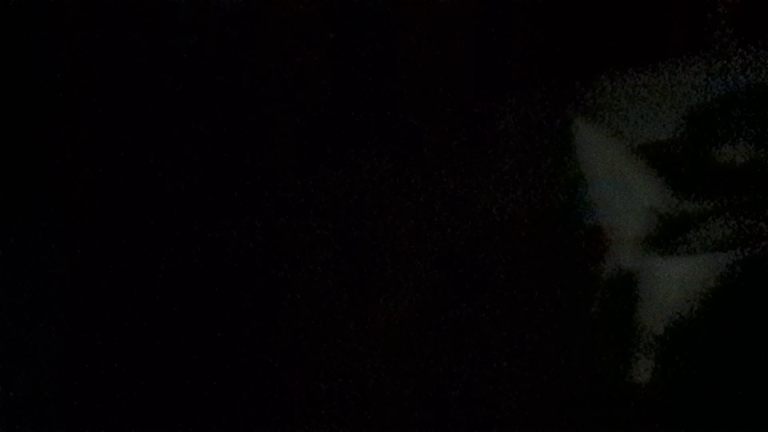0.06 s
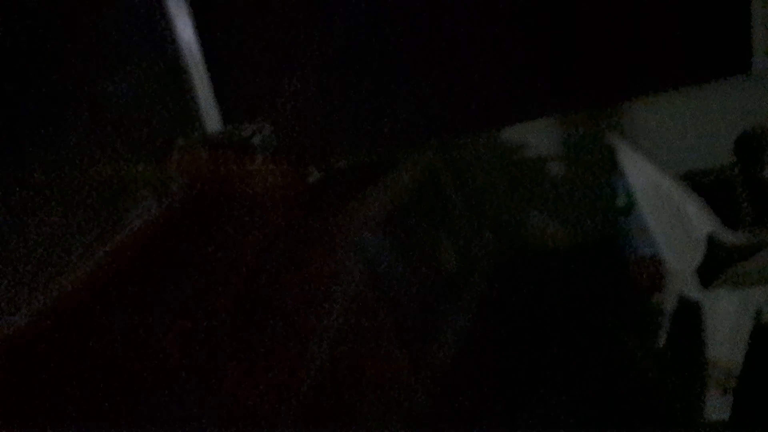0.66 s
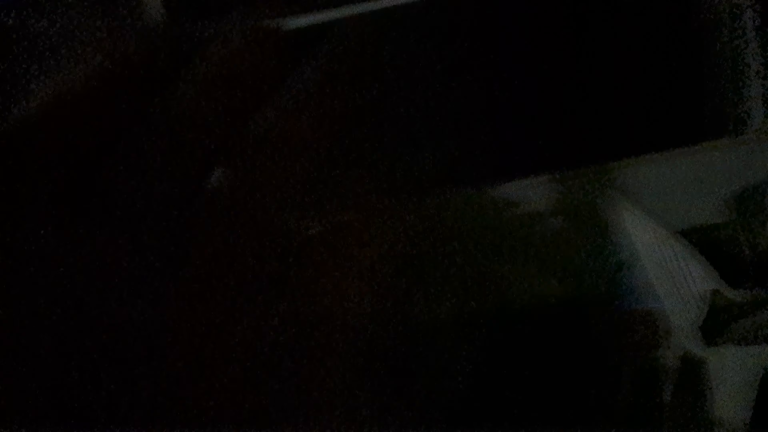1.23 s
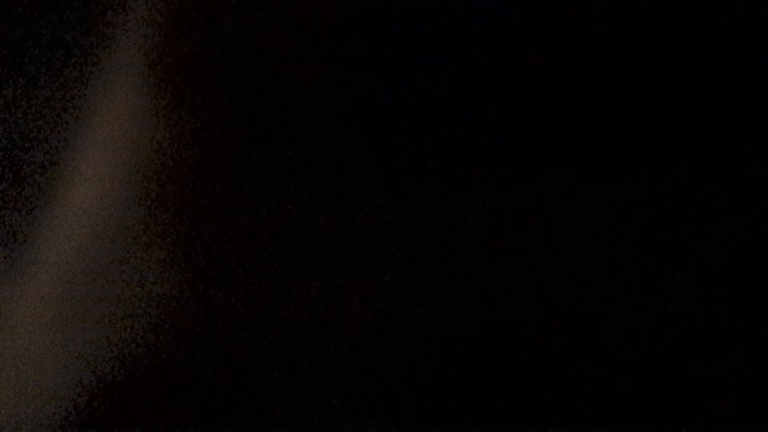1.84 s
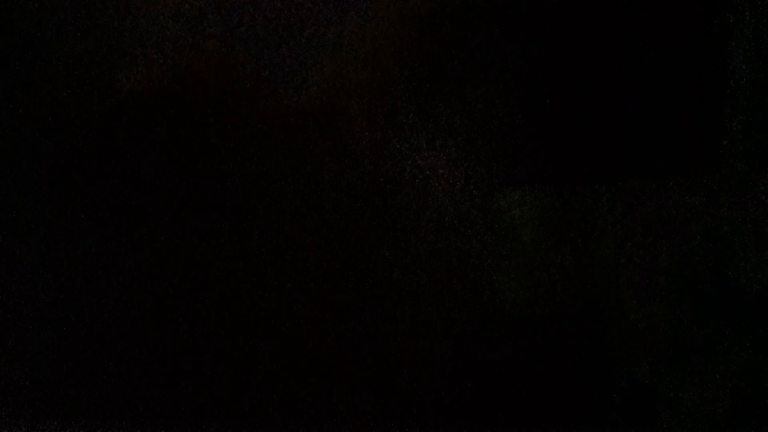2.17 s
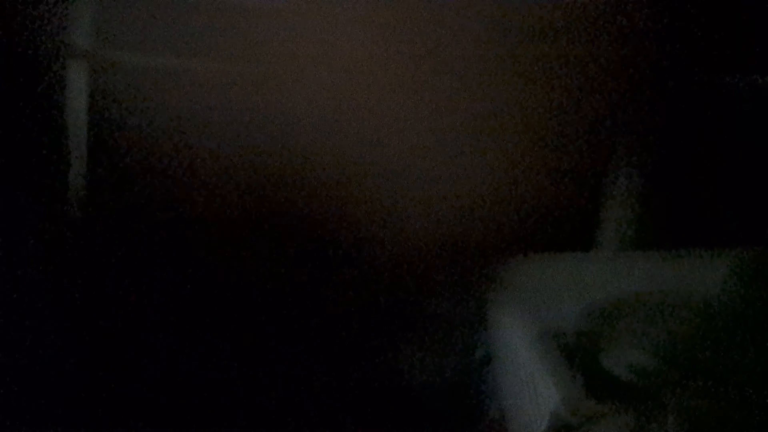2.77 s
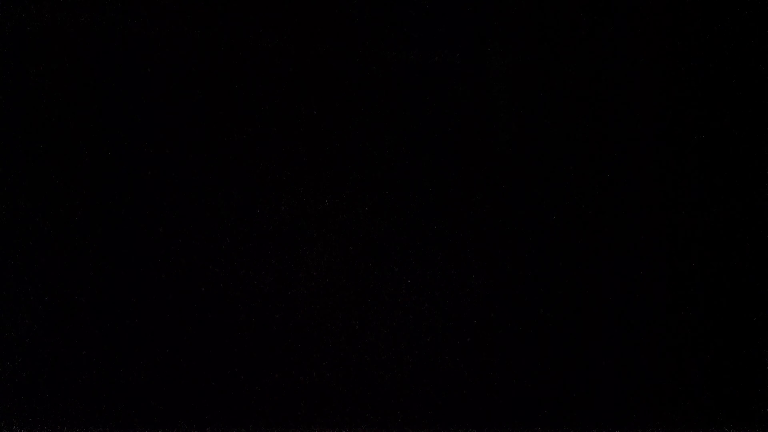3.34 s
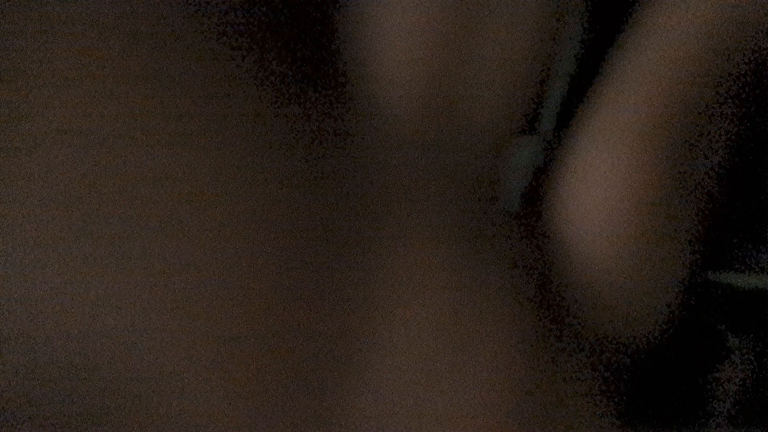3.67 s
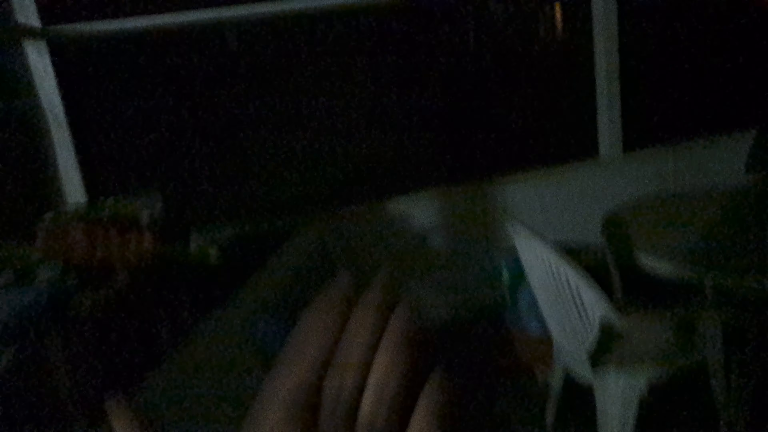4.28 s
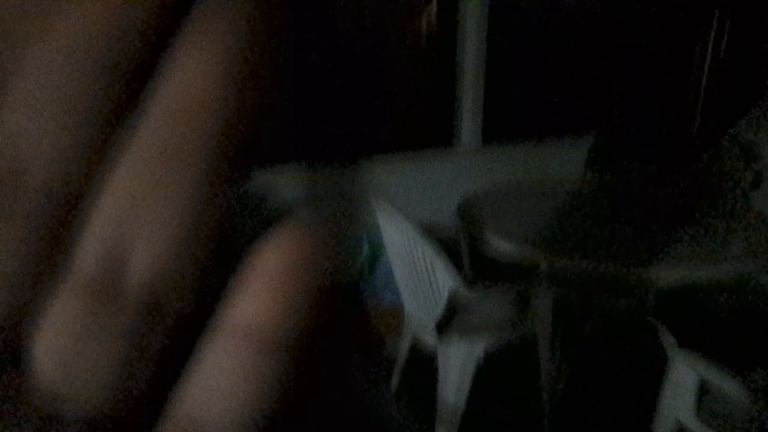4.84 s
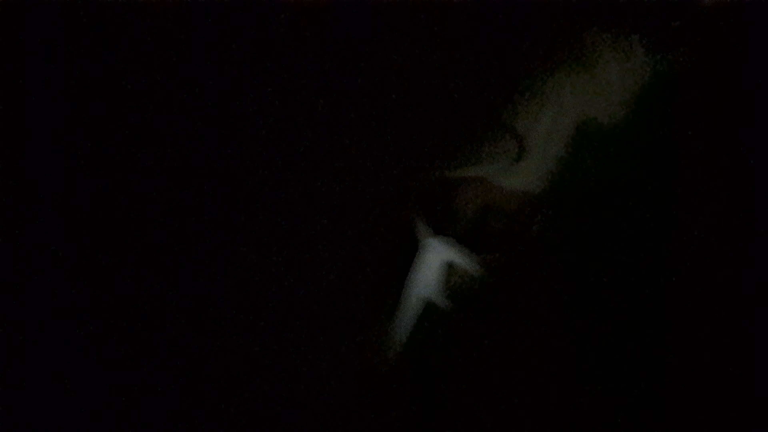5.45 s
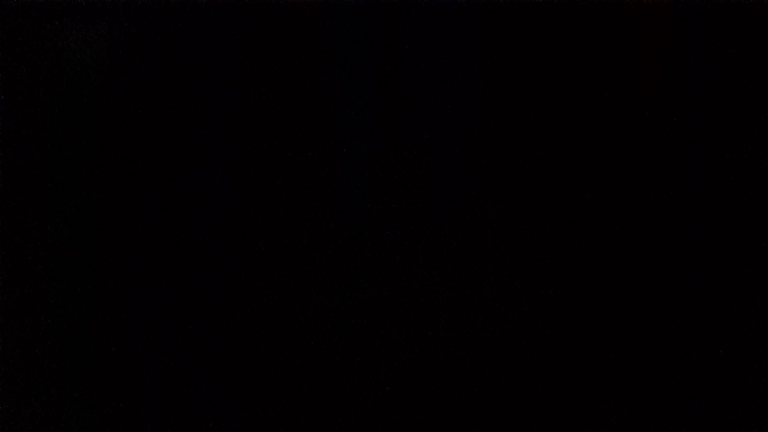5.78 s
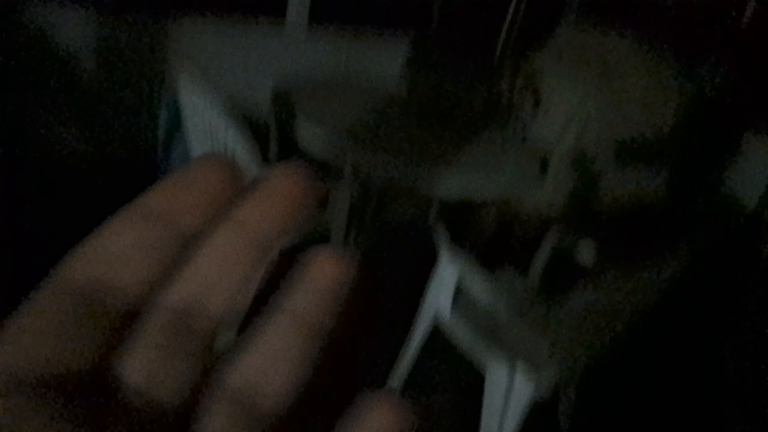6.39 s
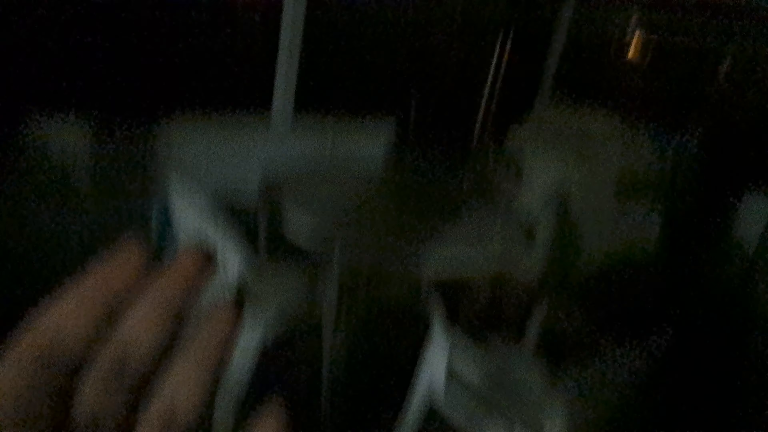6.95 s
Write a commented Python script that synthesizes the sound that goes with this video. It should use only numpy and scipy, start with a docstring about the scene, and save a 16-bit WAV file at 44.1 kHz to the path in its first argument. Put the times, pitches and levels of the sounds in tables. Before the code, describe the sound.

Fingers tap, knock and rub on a hand-held phone right at the microphone, over faint rain.

```python
"""A porch at night: fingers tap and shift on a hand-held phone, with light rain around it. At first the palm
cups the left microphone port, so the taps boom there; then they turn into dry knocks and fade. Finger pads bump
the air at the ports, and after each tap the hand settles with a low rumble. Skin scuffs over the case and
judders across the left port, two more sharp taps follow, and the rain is heard more faintly at first and more
fully later."""
import sys
import numpy as np
from scipy import signal
from scipy.fft import rfft, irfft, next_fast_len
from scipy.io import wavfile
from scipy.ndimage import map_coordinates

SR = 44100
rng = np.random.default_rng(int(sys.argv[2]) if len(sys.argv) > 2 else 0)


def transcribe(u):
    """Save the signal u as a 16-bit wav file named by the first command-line argument.

    u: samples, shape (n,) or (channels, n), limited to [-1, 1]; the rate is SR.
    q: integer samples, one column per channel.
    """
    v = np.clip(np.atleast_2d(u).T, -1, 1)
    q = np.round(v * 32767).astype(np.int16)
    wavfile.write(sys.argv[1], SR, q)


N = 318402
T = np.arange(SR // 4) / SR  # seconds within one event


def amp(db):
    """Decibels to gain."""
    return 10 ** (np.asarray(db) / 20)


def unit(x):
    """Scale to rms 1."""
    return x / np.sqrt(np.mean(x ** 2) + 1e-20)


def blow(x, db, spread_s=0.03):
    """Scale a short sound so that its energy, spread over spread_s, has this level."""
    energy = np.sum(x ** 2, axis=-1, keepdims=True)
    return amp(db) * x * np.sqrt(spread_s * SR / (energy + 1e-20))


def sides(pan_db):
    """Left and right gains for a left-minus-right level."""
    return amp([[pan_db / 2], [-pan_db / 2]])


def along(points, hz):
    """Interpolate (Hz, value) points on a log frequency axis."""
    points_hz, values = np.transpose(points)
    return np.interp(np.log(hz + 1), np.log(points_hz), values)


def curves(rows):
    """One value per sample for each column after the time."""
    times_s, *columns = np.transpose(rows)
    return [np.interp(np.arange(N) / SR, times_s, column) for column in columns]


def wobble(rate_hz):
    """A smooth random curve, rate_hz knots a second."""
    knots = rng.standard_normal(int(N * rate_hz / SR) + 4)
    return map_coordinates(knots, [np.arange(N) * rate_hz / SR])


def swell(peak_s, width_s):
    """A rounded rise and fall with soft skirts."""
    return 1 / (1 + ((np.arange(N) / SR - peak_s) / width_s) ** 2) ** 3


def stroke(length_s):
    """The arched envelope of one slide."""
    return np.sqrt(np.abs(np.sin(np.pi * np.minimum(T / length_s, 1))))


def filtered(x, response):
    """Apply a gain that is a function of Hz."""
    n = x.shape[-1]
    size = next_fast_len(n + 8192)
    hz = np.fft.rfftfreq(size, 1 / SR)
    return irfft(rfft(x, size) * response(hz), size)[..., :n]


def coloured(x, spectrum, tilt_db=0, size=2048):
    """Minimum-phase colouring, tilted by tilt_db per octave above 1500 Hz."""
    hz = np.fft.rfftfreq(size, 1 / SR)
    octaves = np.log2(np.maximum(hz, 1500) / 1500)
    cepstrum = irfft(np.log(amp(along(spectrum, hz) + tilt_db * octaves)))
    cepstrum[1:size // 2] *= 2
    cepstrum[size // 2 + 1:] = 0
    kernel = irfft(np.exp(rfft(cepstrum)))
    return signal.fftconvolve(np.atleast_2d(x), kernel[None], axes=1)[:, :x.shape[-1]]


def ring(hz, t60_s, attack_s):
    """One damped mode."""
    return np.sin(2 * np.pi * hz * T) * amp(-60 * T / t60_s) * (1 - np.exp(-T / attack_s))


def struck(modes, attack_s, base_hz=1):
    """Modes of alternating sign, their strengths and pitches varying from blow to blow."""
    gain_db, detune = rng.normal(0, [[3], [0.055]], (2, len(modes)))
    return sum((-1) ** k * amp(db + gain_db[k]) * ring(base_hz * pitch * np.exp(detune[k]), t60, attack_s)
               for k, (pitch, db, t60) in enumerate(modes))


def grit(shape, spread_db):
    """Noise made of grains of very unequal size."""
    return unit(rng.standard_normal(shape) * amp(spread_db * rng.standard_normal(shape)))


def add(track, start_s, sound):
    """Mix a sound in at a time."""
    i = max(round(start_s * SR), 0)
    track[..., i:i + sound.shape[-1]] += sound[..., :N - i]


# Each row: frequency in Hz, left-right correlation of the rain.
RAIN_LIKENESS = [(60, 0.2), (180, 0.99), (550, 0.52), (1500, 0.14), (5000, 0.23), (15000, 0.14)]

def shower(spectrum, spread_db, lag_s=0):
    """Countless far drops, partly alike in both ports, reaching the right one lag_s later."""
    def mid_side_gains(hz):
        angle = np.arccos(np.clip(along(RAIN_LIKENESS, hz), 0, 1)) / 2
        return amp(along(spectrum, hz)) * [np.cos(angle), np.sin(angle)]
    mid, side = filtered(grit((2, N), spread_db), mid_side_gains)
    return unit(np.array([mid + side, np.roll(mid - side, round(lag_s * SR))]))


# Each row: frequency in Hz, relative density in dB.
PATTER_SPECTRUM = [(40, -17), (120, -1), (220, 1.5), (400, 3), (700, -1.5), (1200, -6), (1800, -29),
                   (4000, -81)]
HISS_SPECTRUM = [(700, -91), (1300, -4), (1900, 1), (2400, -2.5), (3000, -6.5), (4200, -9.5), (6000, -24),
                 (10000, -70)]
SPRAY_SPECTRUM = [(2500, -34), (4800, 0), (7800, -2), (8800, -8), (10500, -5.5), (12700, -4.5), (15500, -9),
                  (16500, -42)]
# Each row: time in seconds, then patter, hiss and spray in dB before each layer's trim.
RAIN_LEVELS = [(0.0, -63, -61.5, -68), (0.24, -65.5, -64.5, -71.5), (1.22, -67, -62.5, -70.5),
               (1.37, -72, -69, -72), (2.17, -66.5, -63, -69.5), (2.59, -62.5, -61, -62),
               (3.04, -67.5, -60, -63), (3.96, -61, -57, -63), (4.38, -64, -61.5, -65.5),
               (5.57, -65.5, -61, -65.5), (6.56, -57.5, -55, -61), (7.22, -62, -58, -62.5)]

def rain(lag_s=0.00049):
    """Patter on the ground, hiss in the leaves and fine spray."""
    patter_db, hiss_db, spray_db = curves(RAIN_LEVELS)
    drift_db = 0.7 * wobble(7)
    patter = amp(patter_db + 6.5) * shower(PATTER_SPECTRUM, spread_db=5.5)
    hiss = amp(hiss_db + 3 + drift_db) * shower(HISS_SPECTRUM, spread_db=6, lag_s=lag_s)
    spray = amp(spray_db + 2.5) * shower(SPRAY_SPECTRUM, spread_db=5, lag_s=lag_s)
    return (patter + hiss + spray) * sides(pan_db=-0.72)


TREMOR_DB, SETTLE_DB = [[-80], [-62]], [[-22], [-10.5]]  # left, right; settling is relative to the thump
# Each row: frequency in Hz, relative density in dB.
RUMBLE_SPECTRUM = [(15, -4), (30, -2), (60, 4), (90, -4), (150, -10.5), (300, -20.5), (600, -33),
                   (1500, -83)]
# Each row: peak time in seconds, width in seconds, left level in dB, right level in dB.
GRIP_SHIFTS = [(0.01, 0.053, -35, -64), (0.177, .1, -25.5, -49), (0.64, 0.1, -41.5, -41),
               (1.197, 0.024, -26, -46), (2.933, 0.046, -72, -40.5), (3.37, 0.038, -39.5, -39),
               (3.489, 0.036, -43, -42), (3.72, 0.12, -73, -44), (4.27, 0.1, -45, -49),
               (4.48, .06, -44, -43), (4.654, 0.083, -53, -52), (4.839, 0.096, -37, -31.5),
               (5.248, 0.18, -65, -53.5), (5.587, 0.046, -50, -47), (6.8, 0.29, -52, -52),
               (7.2, 0.046, -37.5, -38)]

def grip():
    """The hand rumbles on the case: it trembles at rest, settles after taps, drags at scuffs, shifts."""
    effort = np.zeros((2, N)) + amp(TREMOR_DB)
    for start_s, thump_db, knock_db, *_ in TAPS:
        left_db, right_db = thump_levels(start_s, thump_db, knock_db)
        effort += amp([[left_db], [right_db]]) * amp(SETTLE_DB) * swell(start_s + 0.032, width_s=0.059)
    for start_s, length_s, db, _ in SCUFFS:
        effort += amp(db - 7.5) * sides(pan_db=-28) * swell(start_s + length_s, width_s=0.058)
    for peak_s, width_s, left_db, right_db in GRIP_SHIFTS:
        effort += amp([[left_db], [right_db]]) * swell(peak_s, width_s)
    rumble = unit(filtered(rng.standard_normal((2, N)), lambda hz: amp(along(RUMBLE_SPECTRUM, hz))))
    return effort * amp(3.6 * wobble(22)) * rumble


PALM_LIFTS_S = 1.3
SEAL_GAIN_DB, SEAL_CEILING_DB, OPEN_LEFT_DB = 19.5, -13.5, -35

def thump_levels(start_s, thump_db, knock_db):
    """Left and right dB: while the palm seals the left port, trapped air turns a knock into a boom."""
    if start_s < PALM_LIFTS_S:
        return min(knock_db + SEAL_GAIN_DB, SEAL_CEILING_DB), thump_db
    return thump_db + OPEN_LEFT_DB, thump_db


# Low case modes at each port. Each row: frequency in Hz, relative level in dB, T60 in seconds.
LEFT_MODES = [(67.8, -16, 0.31), (131, 6, 0.028), (236, -17, 0.0076)]
RIGHT_MODES = [(67, -0.69, 0.13), (132, -0.58, 0.045), (223, 0.94, 0.03)]

def thump(modes):
    """The case rocks in the hand, a little differently each time."""
    out = np.zeros(len(T))
    for hz, db, t60_s in modes:
        gain = amp(db + rng.normal(0, 5.1))
        out += gain * ring(hz * np.exp(rng.normal(0, 0.066)), t60_s, attack_s=0.0012)
    return out


# Each row: frequency in Hz, relative density in dB.
CLICK_SPECTRUM = [(300, -16), (900, 1), (1400, 7), (2100, 2), (3200, -2.5), (4800, -3.5), (7000, -3.5),
                  (9500, -8), (13000, 0.5), (16000, -8.5)]

def click(tilt_db):
    """The fingertip lands with a sharp edge and chatters, then bounces back more softly a few times."""
    strikes = amp(-60 * T / 0.02)
    for delay_s, db in zip(rng.uniform(0.004, 0.026, size=3), rng.normal(-23.5, 1.4, size=3)):
        strikes += (T > delay_s) * amp(db - 60 * np.abs(T - delay_s) / 0.009)
    chatter = grit((2, len(T)), spread_db=5) * strikes
    chatter[:, 0] -= 7  # the sharp edge
    return coloured(chatter, CLICK_SPECTRUM, tilt_db)


# Sliding skin. Each row: frequency in Hz, relative density in dB.
SKIN_SPECTRUM = [(250, 4), (500, -12), (1200, 6.5), (2000, -1), (3500, 2.5), (7000, -1), (9500, -4),
                 (13000, 2.5), (16000, -4)]

def skid(length_s=0.072, t60_s=0.043):
    """After landing, the fingertip skids with a bright sizzle, then sticks."""
    envelope = stroke(length_s) * amp(-60 * T / t60_s)
    return coloured(grit((2, len(T)), spread_db=3) * envelope, SKIN_SPECTRUM, tilt_db=5.5)


# Each row: multiple of the knock's pitch, relative level in dB, T60 in seconds.
SHELL_MODES = [(.82, 4.5, 0.024), (1.12, 2.5, 0.027), (1.6, -3.5, 0.014)]
# Air in the hand's hollow; hard plastic. Each row: frequency in Hz, relative level in dB, T60 in seconds.
HOLLOW_MODES = [(754, 12, 0.0048), (1027, -4, 0.011)]
PLASTIC_MODES = [(1850, -1, .006), (2300, 0, .007), (4500, -3, .004), (5000, -2, .005)]

def tap(left_db, right_db, knock_db, knock_hz, hollow_db, click_db, pan_db, tilt_db, skid_db, lead_s):
    """A finger lands at lead_s: it rocks the case, rings shell, hollow and plastic, clicks and skids."""
    out = np.zeros((2, SR // 2))
    add(out[0], lead_s, blow(thump(LEFT_MODES), left_db))
    add(out[1], lead_s + 0.00046, blow(thump(RIGHT_MODES), right_db))
    knock = blow(struck(SHELL_MODES, attack_s=0.0018, base_hz=knock_hz), knock_db)
    hollow = blow(struck(HOLLOW_MODES, attack_s=0.0036), hollow_db)
    edge = blow(click(tilt_db), click_db - 0.18)
    # a flatter, duller finger drives the hard plastic more
    clack = blow(struck(PLASTIC_MODES, attack_s=0.00051), click_db - 18.5 - tilt_db)
    body_pan, click_pan = sides(pan_db + 2.5), sides(pan_db)
    for port, lag_s in enumerate([0, 0.0004]):
        add(out[port], lead_s - 0.002 + lag_s, body_pan[port] * knock)  # the soft pad touches first
        add(out[port], lead_s + lag_s, body_pan[port] * hollow + click_pan[port] * (edge[port] + clack))
    add(out, lead_s + 0.0067, blow(skid(), skid_db) * click_pan)
    return out


# Each row: start in seconds, right thump in dB, knock in dB, knock pitch in Hz, hollow in dB, click in dB
# before trim, left minus right in dB, click tilt in dB per octave, skid in dB, echo send in dB.
TAPS = [ (0.0584, -45, -35, 500, -38.5, -36, 10, 0, -63, -23.5),
        (0.3359, -25.5, -23, 286, -45, -41, 10, -1, -44.5, -20),
        (0.5647, -25, -24, 407, -33.5, -30.5, 4.5, -2, -54, -26.5),
        (0.7686, -30, -30, 396, -32, -37.5, 11, 0, -51, -27),
        (0.9545, -31, -28, 406, -32, -32.5, 11.5, 1.6, -57, -23.5),
        (1.0374, -42, -56.5, 484, -73, -61.5, -18, -1.5, -77, -24.5),
        (1.1339, -32, -31.5, 442, -32, -37, 9, -0.5, -54, -19.5),
        (1.339, -30, -26, 495, -27.5, -32, 6, -1, -58, -22.5),
        (1.516, -34, -30, 507, -49, -33.5, 1, 1, -63, -22.5),
        (1.6016, -40, -46.5, 450, -68, -65.5, -5, 0, -74, -22),
        (1.685, -25.5, -26.5, 503, -32.5, -36.5, 6.5, 0, -51, -17.5),
        (1.8686, -28, -27, 517, -31.5, -35.5, 5.5, 0.5, -60, -16),
        (2.0393, -35, -32, 504, -40.5, -39, 1.5, -1, -44.5, -15),
        (2.1991, -34, -38, 510, -49.5, -41.5, 2.5, -0.7, -51, -20),
        (2.402, -45, -49.5, 626, -62, -46, 12, -2, -59, -12),
        (2.475, -35, -43.5, 482, -49, -48.5, 12, -3, -53, -26),
        (2.7373, -33, -31, 448, -39.5, -42.5, 2.5, 0.5, -52, -7.5),
        (4.1256, -29.5, -30, 540, -33.5, -26.5, 1, -2.1, -52, -15),
        (4.7583, -28, -24, 412, -40.5, -26.5, 1.5, 0.2, -38.5, -13.5),
        (6.12, -72, -63, 470, -58, -59, 9, -2.5, -72, -8), ]

def taps(lead_s=0.005):
    """Every tap with its own echo, which reaches the uncovered right port best."""
    out = np.zeros((2, N))
    for start_s, thump_db, knock_db, *touch, echo_db in TAPS:
        sound = tap(*thump_levels(start_s, thump_db, knock_db), knock_db, *touch, lead_s)
        add(out, start_s - lead_s, sound)
        add(out, start_s - lead_s, amp(echo_db) * sides(pan_db=-10.5) * porch_echo(sound))
    return out


# Each row: frequency in Hz, T60 in seconds.
PORCH_DECAY = [(200, 0.65), (2000, 0.39), (6000, 0.33), (14000, 0.21)]

def porch_echo(x, low_cut_hz=900):
    """Roof and walls answer after 10 ms, each frequency dying at its own speed."""
    bands_hz, times_s, noise = signal.stft(rng.standard_normal((2, SR // 2)), SR, nperseg=256)
    decay = amp(-60 * times_s / along(PORCH_DECAY, bands_hz)[:, None])
    _, tail = signal.istft(noise * decay, SR, nperseg=256)
    airborne = filtered(x.mean(0), lambda hz: hz ** 2 / (hz ** 2 + low_cut_hz ** 2))
    delayed = np.pad(airborne, (SR // 100, 0))
    return signal.fftconvolve(delayed[None], tail / np.linalg.norm(tail[0]), axes=1)


SEALED_CYCLES, OPEN_CYCLES = 0.24, 0.45  # decay of a swing under the palm and in open air
# Each row: frequency in Hz, relative density in dB.
BRUSH_SPECTRUM = [(100, -4.5), (280, 6), (480, -3.5), (800, -10), (1200, -34), (4000, -70)]
# Each row: time in seconds, left level in dB, right level in dB, pitch in Hz.
PAD_BUMPS = [(0.148, -30, -48, 193), (0.157, -18, -50, 169), (0.196, -19, -63, 152), (0.397, -23, -56, 106),
             (0.414, -27, -47, 111), (0.539, -31, -63, 144), (0.619, -33, -41, 141),
             (0.826, -34.5, -43, 117), (0.962, -22.5, -42, 230), (1.002, -36, -53, 148),
             (1.175, -30, -51, 205), (1.21, -24.5, -46, 198), (1.229, -18.5, -51, 182),
             (1.238, -26.5, -55, 198), (2.345, -68, -37.5, 128), (2.532, -59, -51, 138),
             (2.606, -47, -37, 327), (2.625, -70, -39, 144), (2.748, -65, -43, 201), (3.352, -47, -49, 157),
             (3.485, -48, -46.5, 138), (3.744, -59, -50, 130), (4.13, -39, -30.5, 191),
             (4.156, -45, -30.5, 146), (4.213, -32.5, -35, 147), (4.236, -36.5, -35, 142),
             (4.816, -50, -34, 157), (4.846, -35.5, -33, 138), (4.882, -49, -40, 94),
             (7.164, -54, -45.5, 152)]

def bumps(lead_s=0.02):
    """A soft pad pushes the air at the ports: a rounded swing, a brush of skin, then the case sways."""
    out = np.zeros((2, N))
    sway = ring(68, t60_s=0.063, attack_s=0.0046)
    for time_s, left_db, right_db, hz in PAD_BUMPS:
        cycles = (T - lead_s) * hz
        decay_cycles = SEALED_CYCLES if time_s < PALM_LIFTS_S else OPEN_CYCLES
        envelope = np.exp(-np.hypot(cycles, 0.1) / decay_cycles)
        for port, db in enumerate([left_db, right_db]):
            swing = np.cos(2 * np.pi * cycles + rng.uniform(0, 2 * np.pi)) * envelope
            brush = coloured(grit(len(T), spread_db=2.5) * np.exp(-np.abs(cycles)), BRUSH_SPECTRUM)[0]
            add(out[port], time_s + 0.00157 - lead_s, blow(swing, db) + blow(brush, db - 15.5))
            add(out[port], time_s, blow(sway, db - 10))
    return out


# Each row: start in seconds, length in seconds, relative level in dB, left minus right in dB.
SCUFFS = [(2.312, 0.0079, -53.5, 4), (2.332, 0.039, -52.5, 2), (2.406, 0.0094, -47.5, 15.5),
          (2.456, 0.061, -50.5, -1), (2.532, 0.0078, -50, -1), (2.592, 0.055, -49.5, 2.5),
          (2.659, 0.02, -56, -1), (2.73, 0.029, -53.5, 11), (2.886, 0.044, -47.5, 15),
          (3.33, 0.089, -60.5, 5), (3.458, 0.11, -67.5, 16)]

def scuffs():
    """Dry skin catches and lets go in small clumps as it slides; the same clumps shake the shell."""
    out = np.zeros((2, N))
    shell = ring(456, t60_s=0.016, attack_s=0.00036)
    for start_s, length_s, db, pan_db in SCUFFS:
        clumps = amp(4.9 * np.clip(wobble(290)[:len(T)], -2, 2))
        rasp = unit(coloured(grit((2, len(T)), spread_db=3) * clumps, SKIN_SPECTRUM))
        body = unit(signal.fftconvolve(grit(len(T), spread_db=7.5) * clumps, shell)[:len(T)])
        add(out, start_s, amp(db + 5.5) * sides(pan_db) * stroke(length_s) * (rasp + amp(-6) * body))
    return out


# Each row: time in seconds, level in dB (the first row's counts as silence), slips per second.
JUDDER_STROKE = [(2.870, -66, 250), (2.875, -44, 250), (2.891, -42, 280), (2.897, -16, 330),
                 (2.904, -24, 370), (2.913, -27, 400), (2.922, -36, 420), (2.935, -66, 420)]

def judder():
    """A finger sticks and slips across the left port at an uneven, rising rate."""
    db, rate_hz = curves(JUDDER_STROKE)
    uneven_hz = rate_hz * np.exp(0.18 * wobble(200))
    slips = np.diff(np.floor(np.cumsum(uneven_hz) / SR), prepend=0)
    envelope = np.maximum(amp(db) - amp(db[0]), 0)
    return creak(slips) * envelope * amp([[0], [-26]])


# Each row: frequency in Hz, relative density in dB.
SLIP_SPECTRUM = [(150, -42), (330, 4.5), (600, -6), (900, -3), (1200, -3), (1450, -2), (1800, -8),
                 (2600, -17), (4500, -20.5), (8000, -38), (16000, -31)]

def creak(slips):
    """Slip pulses mixed with coarse grit make a rough creak."""
    return unit(coloured(unit(slips) + 0.89 * grit(N, spread_db=10.5), SLIP_SPECTRUM))


def scene():
    """Handling close to the ports, rain far behind."""
    return taps() + bumps() + scuffs() + judder() + grip() + rain()


LOW_CUT_HZ, TOP_HZ = 39, 16100

def record(dry):
    """The input drops the deepest bass, the hardest taps overload it softly, and the top is cut."""
    lean = signal.sosfilt(signal.butter(3, LOW_CUT_HZ, "highpass", fs=SR, output="sos"), dry)
    clipped = lean / (1 + np.abs(lean) ** 6) ** (1 / 6)
    return filtered(clipped, lambda hz: 1 / np.sqrt(1 + (hz / TOP_HZ) ** 120))


dry = scene()
out = record(dry)
transcribe(out)
```